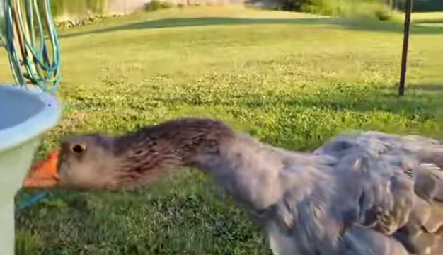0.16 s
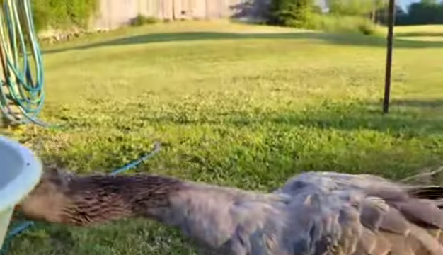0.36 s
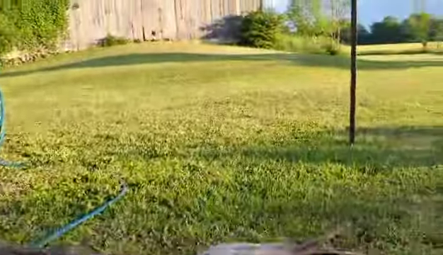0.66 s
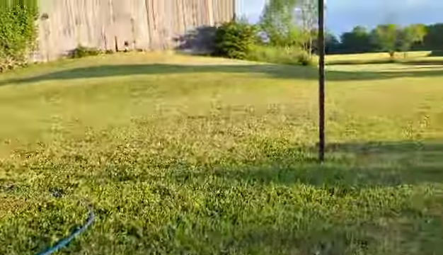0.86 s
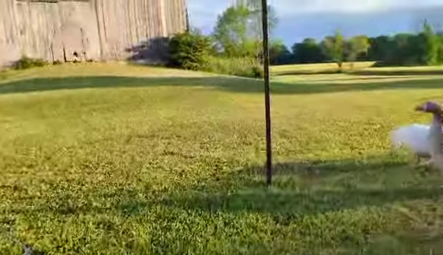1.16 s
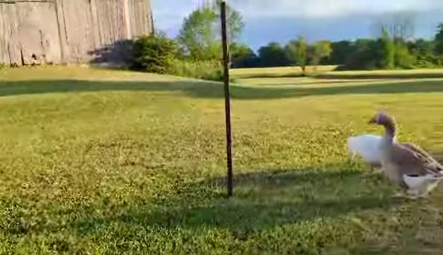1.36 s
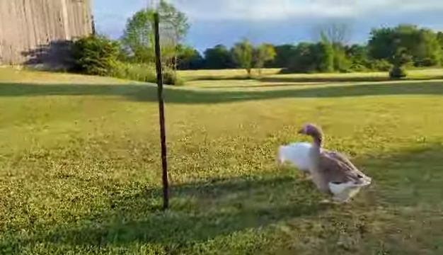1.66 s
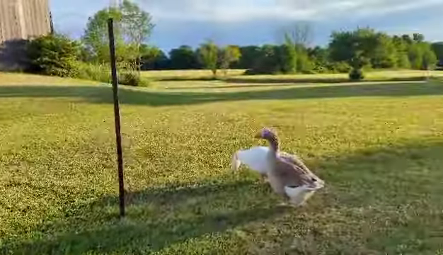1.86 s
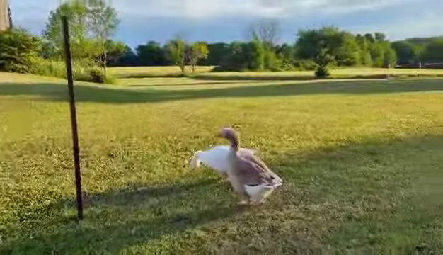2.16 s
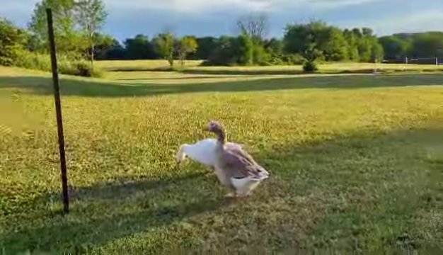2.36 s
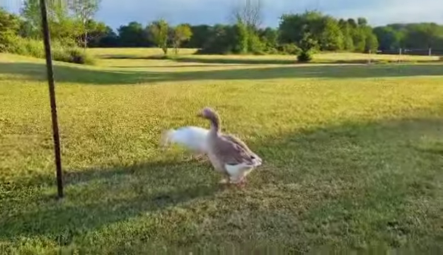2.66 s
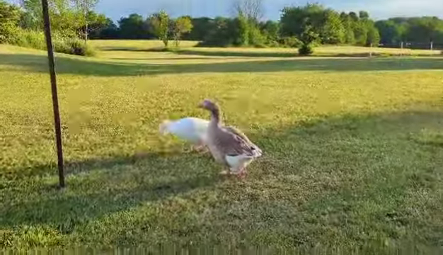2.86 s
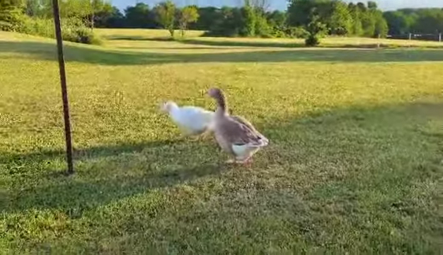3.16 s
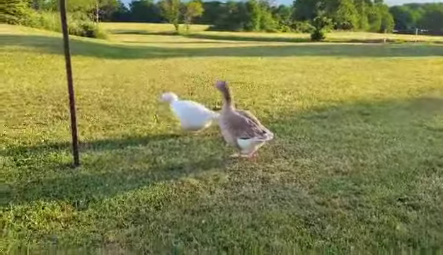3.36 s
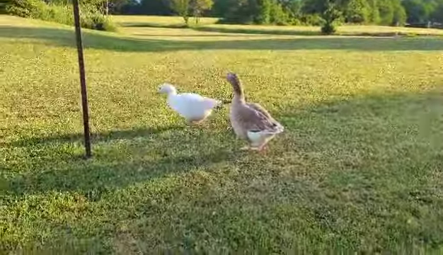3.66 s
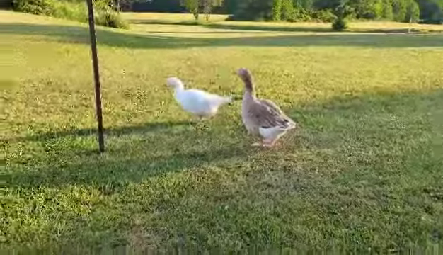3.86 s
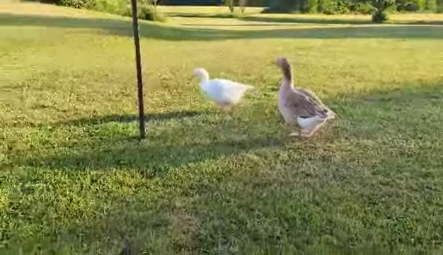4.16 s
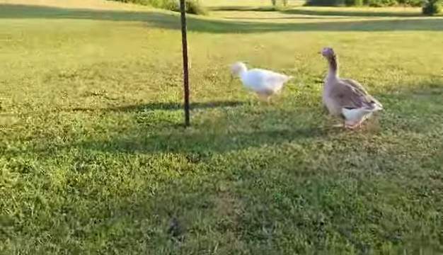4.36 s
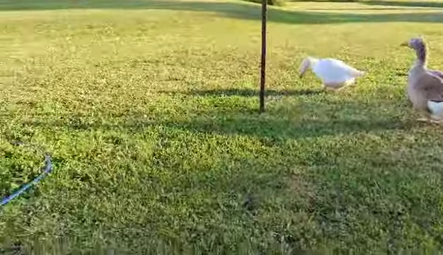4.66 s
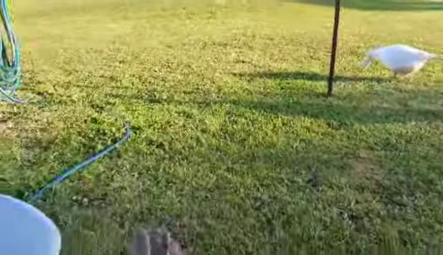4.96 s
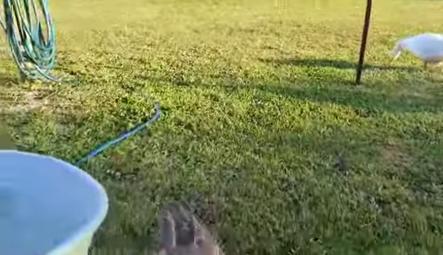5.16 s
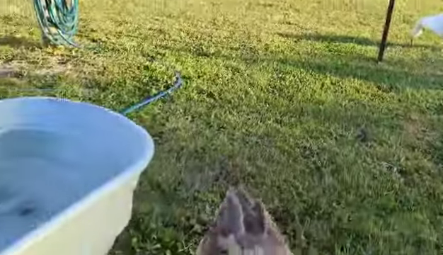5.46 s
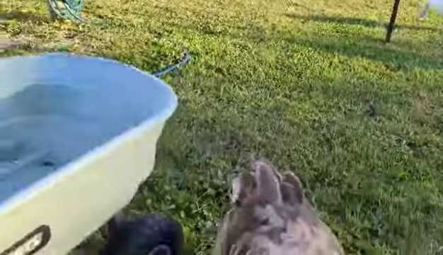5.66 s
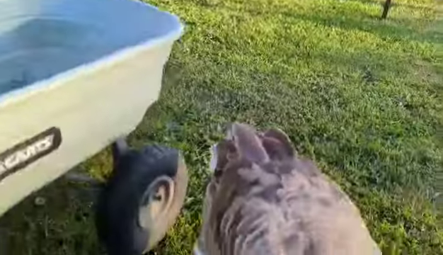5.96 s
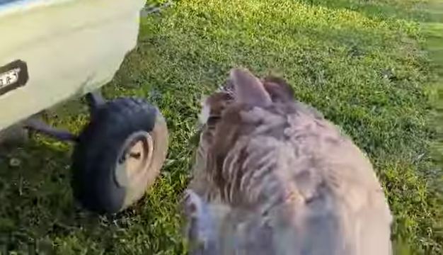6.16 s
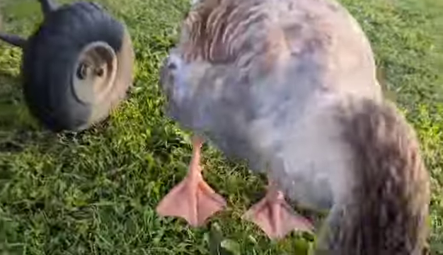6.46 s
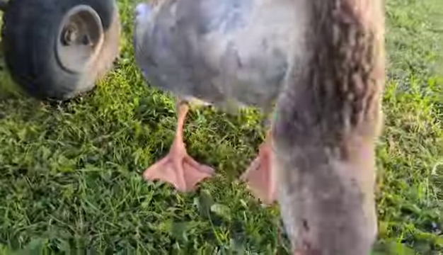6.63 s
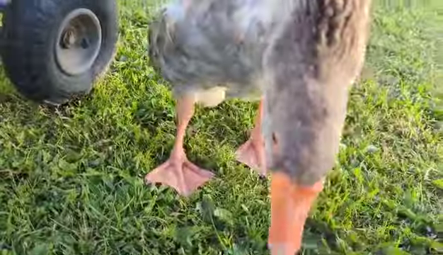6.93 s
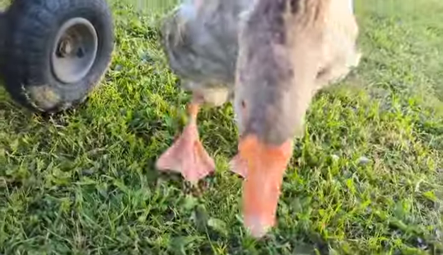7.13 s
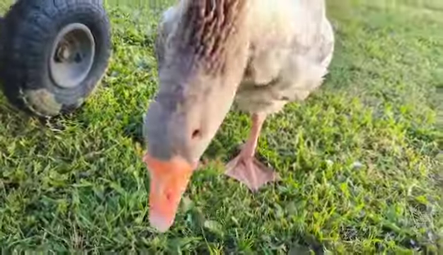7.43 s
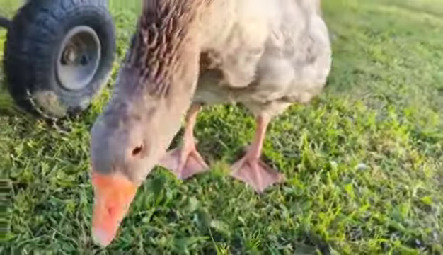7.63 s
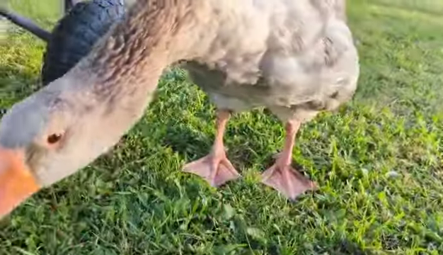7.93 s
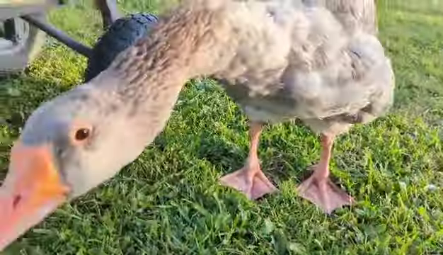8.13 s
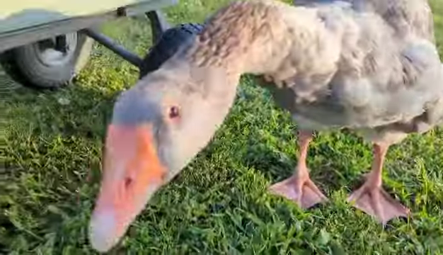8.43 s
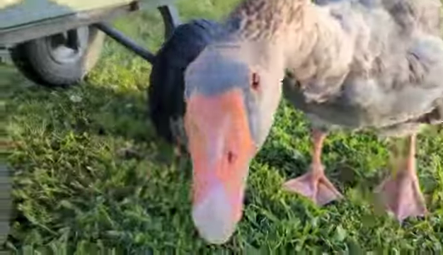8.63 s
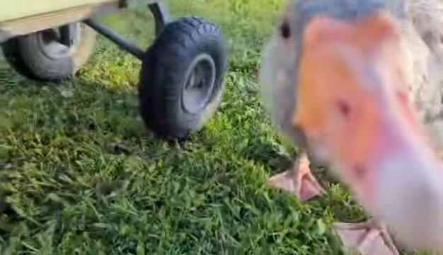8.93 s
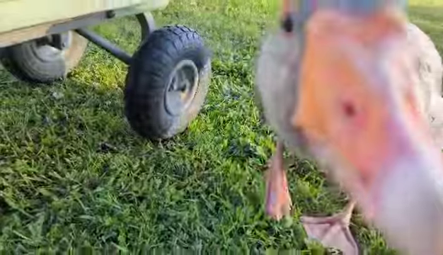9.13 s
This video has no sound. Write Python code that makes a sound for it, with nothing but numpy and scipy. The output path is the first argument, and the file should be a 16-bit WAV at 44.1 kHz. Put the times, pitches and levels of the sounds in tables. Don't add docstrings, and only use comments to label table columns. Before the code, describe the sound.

A close goose squeaks, growls and honks rapidly, two others answer farther off, then it blares again nearby amid crackling grass and light wind.

```python
import sys
import numpy as np
from scipy import signal
from scipy.fft import rfft, irfft, next_fast_len
from scipy.io import wavfile
from scipy.ndimage import uniform_filter1d, map_coordinates

SR = 44100
rng = np.random.default_rng(int(sys.argv[2]) if len(sys.argv) > 2 else 0)


def natural_amplitude(level_db):
    exponent = np.asarray(level_db, float) / 20
    return 10 ** exponent


def store_wav(level_fs):
    pcm = np.round(np.clip(np.atleast_2d(level_fs), -1, 1) * 32767)
    wavfile.write(sys.argv[1], SR, pcm.T.astype(np.int16))


N = 409679
TIME = np.arange(N) / SR

# (time [s], pulse rate [Hz], throat level [dB], chest tone [dB])
GROWLS = [
    [(0.0, 161, -52.5, -61), (0.064, 166.9, -48, -63), (0.106, 187.6, -36, -56), (.17, 163.5, -44.5, -66),
     (0.264, 176.3, -46, -73), (0.33, 173.8, -42.5, -59)],
    [(0.74, 212.6, -79, -90), (0.804, 175.2, -32, -45.5), (0.84, 156, -58.5, -69)],
    [(2.21, 175.2, -54, -66), (2.245, 170.2, -52, -73), (2.276, 170, -49, -57), (2.34, 190.5, -39.5, -70),
     (2.378, 169.3, -43.5, -68), (2.442, 201, -60.5, -56.5), (2.6, 168, -86, -58)],
    [(7.662, 202, -43, -40), (7.68, 194.4, -30.5, -28.5), (7.728, 189.6, -38, -30),
     (7.75, 175.8, -44.5, -63.5), (7.8, 174.7, -57, -62)],
    [(7.81, 168.2, -32, -69), (7.84, 178, -38, -42), (7.87, 156, -51, -67)],
]
# (time [s], pulse rate [Hz], throat level [dB], chest tone [dB])
LAST_GROWL = [(7.895, 164.6, -39.5, -57), (7.97, 168.9, -35.5, -34), (8.033, 189.3, -35, -45),
              (8.092, 161.6, -34.5, -37), (8.15, 186.1, -35, -44), (8.207, 171.4, -37, -47),
              (8.259, 193.8, -35, -63), (8.302, 184.8, -36.5, -38), (8.333, 155.4, -36.5, -73)]
# (frequency [Hz], width [Hz], level [dB])
THROAT_MODES = [(530, 110, 2), (683, 82, 4.5), (900, 37, -5.5), (1120, 900, 2)]
# (frequency [Hz], width [Hz], level [dB])
BEAK_MODES = [(1910, 250, -11.5), (2500, 410, -16.5), (3540, 680, -16)]
PUFF_BITE_DB = 3

# (start [s], length [s], first pitch [Hz], last pitch [Hz], level [dB])
SQUEAKS = [(0, 0.088, 597, 508, -47), (.064, 0.069, 490, 727, -43.5), (.09, 0.14, 755, 662.6, -36.5),
           (.218, 0.078, 696, 757, -34), (.288, 0.057, 760, 843, -31), (.385, 0.039, 754, 830, -30),
           (.412, 0.075, 824.7, 793, -35), (.48, 0.1, 794, 817.5, -29.5), (.586, 0.05, 744, 834, -31),
           (.675, 0.046, 787, 811, -34), (7.897, 0.045, 780, 826, -25.5), (8.195, 0.12, 718, 767, -32.5)]
# (start [s], length [s], first pitch [Hz], last pitch [Hz], level [dB])
PIPS = [(4.71, 0.13, 831, 615, -52), (5.11, 0.13, 700, 692, -55.5), (5.96, 0.16, 841, 695, -60.5),
        (6.33, .11, 900, 726, -49), (6.645, 0.11, 866, 659, -42.5)]
# (start [s], length [s], first pitch [Hz], last pitch [Hz], level [dB])
HOOTS = [(6.615, 0.05, 470, 455, -58)]
# (start [s], length [s], first pitch [Hz], last pitch [Hz], level [dB])
SHRIEKS = [(.618, .034, 806, 860, -34.5), (.708, 0.047, 803, 856, -35)]
# (start [s], length [s], first pitch [Hz], last pitch [Hz], level [dB])
MURMURS = [
    (2.215, 0.0693, 668, 647, -41),
    (2.282, .07, 653, 750, -40),
    (2.345, 0.052, 761, 710, -39.5),
]
# (start [s], length [s], first pitch [Hz], last pitch [Hz], level [dB])
YELPS = [(2.08, 0.089, 759, 694, -36)]
# (frequency [Hz], level [dB])
REED = [(1200, -1.5), (1600, 7), (2400, 2.5), (3300, 1.5), (4200, -11), (5000, -13.5), (7000, -17),
        (10000, -32.5)]
# (frequency [Hz], level [dB])
WIDE = [(1700, -2), (2500, -15.5), (3350, -2), (4200, -22), (5000, -7.5), (7000, -24.5), (10000, -29)]
# (frequency [Hz], level [dB])
PIPE = [(1200, 0), (1600, -2), (2400, -11), (3300, -20)]
# (brokenness [0-1.6], overtones [dB], air [dB], crest position [0-1],
# loss at the start [dB], loss at the end [dB])
FULL = (1, -12, -15, 0.4, -0.5, 4.5)
FAINT = (0.8, -6, -14, .65, 8, 9)
PURE = (.1, -30, -30, 0.5, 8, 8)
SHRILL = (0.46, 6, -14, 6, 2.5, 2.5)
LEVEL = (0.7, -15.5, -20.5, -6.5, 6.5, 0)
SUDDEN = (1.57, -10.5, -14.5, 0, 9, 14)
ARCH = 0.011
REEDY_HZ, REEDY_SPAN_HZ, REEDY_DB_PER_HZ = 801.7, 30, 0.5

# (time [s], level [dB])
AIR = [(0, -68.5), (3.6, -70.5), (3.8, -71.5), (4.6, -71.5), (6, -67.5), (9.3, -69)]
# (frequency [Hz], density [dB per Hz])
FIELD = [(71, -37.5), (120, -10.5), (398, -8.5), (466, -6), (2680, -3.5), (4140, -11.5), (6130, -9.5),
         (12200, -19.5), (13200, -40)]
# (start [s], hold [s], level [dB])
RUSTLES = [(.13, 0.62, -62.5), (.88, .04, -60.5), (1.27, 0.12, -73), (2.0, 0.033, -64.5), (2.25, 0.34, -70),
           (2.88, .03, -69.5), (3.1, .03, -68), (3.25, 0.042, -62.5), (3.43, 0.076, -61), (3.6, .06, -60),
           (3.8, 0.068, -63), (3.975, 0.028, -56.5), (4.02, .08, -64.5), (4.3, 0.037, -58.5),
           (4.82, 0.39, -56.5), (5.2, 0.39, -61.5), (5.6, 0.22, -59.5), (5.88, 0.25, -63.5),
           (6.33, 0.055, -58.5), (6.48, .03, -55), (6.54, 0.45, -64.5), (6.75, 0.0079, -46),
           (7.12, .14, -59.5), (7.41, 0.025, -62.5), (7.58, 0.019, -60), (7.68, 0.026, -53.5),
           (7.9, 0.58, -67.5), (8.65, 0.099, -60), (8.8, .2, -66), (9.12, 0.5, -57)]
# (frequency [Hz], density [dB per Hz])
HISS = [(880, -36), (1500, -5), (2260, -11), (2810, -9.5), (6200, 2), (10500, -1), (12300, 2.5),
        (13200, -6.5)]
# (start [s], hold [s], level [dB])
STRIDES = [
    (.89, 0.0015, -55.5),
    (1.57, 0.0099, -64.5),
    (4.3, .03, -68.5),
    (4.35, 0.063, -48.5),
    (4.75, 0.12, -59.5),
    (4.84, 0.4, -53.5),
    (5.66, 0.12, -45),
    (5.82, 0.098, -59.5),
]
# (frequency [Hz], density [dB per Hz])
GRASS = [(290, -29.5), (500, -27), (935, -15.5), (1260, -3), (2110, -13), (2880, -11), (6270, -15),
         (8000, -20.5), (10400, -28), (17600, -120)]
# (start [s], hold [s], level [dB])
GUSTS = [(0, 2.65, -69), (1.85, 0.34, -68), (3.06, 0.13, -53.5), (3.2, .12, -47.5), (3.59, 0.02, -66.5),
         (4.38, 0.036, -66.5), (4.86, 0.013, -50.5), (5.25, 0.014, -58), (5.76, 0.014, -56),
         (5.9, 0.026, -59), (6.39, 0.018, -83), (6.67, 0.029, -68), (7.12, 0.061, -65), (7.4, 0.014, -66),
         (7.7, 0.38, -65.5), (8.3, 2, -85)]
# (frequency [Hz], density [dB per Hz])
RUMBLE = [(20, -37), (35, -26.5), (65, 2.5), (110, -5.5), (160, -8.5), (300, -57)]
BREEZE_DB = -85.5
RUSTLE_SLOPES, STRIDE_SLOPES, GUST_SLOPES, SIGH_SLOPES = (1100, 520), (450, 700), (700, 330), (900, 650)
LAZY_S = 0.085

# (start [s], length [s], second partial at the crest [Hz], its level [dB], roughness [0-1])
NEAR = [(.108, 0.062, 1108, -23.5, 0.07), (.259, 0.051, 1062, -34.5, 0), (.324, 0.086, 1140, -24.5, 0.25),
        (.415, 0.084, 1193, -23, 0.33), (.557, 0.044, 1182, -25, 0.53), (.645, 0.06, 1144, -25.5, 0.4),
        (.75, 0.072, 1163, -25, 0.41)]
# (start [s], length [s], second partial [Hz], its level [dB], roughness [0-1])
TURNED = [(2.4, 0.11, 1140, -24, 0.49), (2.507, 0.081, 1133, -23, 0.45)]
# (start [s], length [s], second partial at the crest [Hz], its level [dB], roughness [0-1])
WHITE = [(2.623, 0.078, 1052, -32.5, 0.32), (2.83, 0.1, 1008, -40.5, 0.5), (3.04, 0.098, 1007, -34.5, 0.45),
         (3.224, 0.11, 1034, -26, 0.27), (3.406, 0.1, 1006, -26, 0.048), (3.579, 0.098, 1005, -25.5, 0.07)]
# (start [s], length [s], second partial at the crest [Hz], its level [dB], roughness [0-1])
GREY = [(6.81, 0.13, 1065, -45.5, 0.48), (7.014, 0.1, 1047, -39, 0.27), (7.189, 0.12, 1078, -30.5, 0.16),
        (7.364, 0.1, 1054, -29.5, 0.03), (7.541, 0.087, 1026, -31.5, 0.087)]
# (start [s], length [s], second partial at the crest [Hz], its level [dB], roughness [0-1])
CLOSE = [(7.664, 0.071, 1119, -20.5, 0.66), (7.815, 0.052, 1038, -43.5, 0.64),
         (7.922, 0.045, 1100, -26, 0.064), (7.975, 0.095, 1089, -27, 0.4),
         (8.115, 0.085, 1102, -26.5, 0.21), (8.228, 0.081, 1134, -25, 0.41)]
BRASS = {"n": [(1250, -22.5), (1450, -16.5), (1950, 13), (2400, 1), (2900, -7), (3600, -5.5), (4500, -19.5),
         (5800, -13), (10000, -38.5)], "n turned": [(1250, 8.5), (1480, -32), (1800, 12), (2340, 3),
         (2740, -6.5), (3300, 0), (4000, -12), (4700, -15), (6500, -24.5), (10000, -40)],
         "n blast": [(1250, 2.5), (1550, -8), (1800, -2), (2140, 9), (2700, -10), (3300, -6.5),
         (3900, -7.5), (5800, -23.5), (10000, -41.5)], "n close": [(1250, -9), (1450, -7), (1860, 15),
         (2460, 8.5), (2800, -2), (3200, -1), (3700, 0), (4640, -18.5), (6500, -15), (10000, -56)],
         "w soft": [(1500, -4.5), (2000, -7), (2500, -12), (3100, -5.5), (3600, -14.5), (4200, -27),
         (8000, -22.5), (10000, -30)], "g soft": [(1550, -3), (2100, -2), (2600, 0.5), (3100, -6.5),
         (3700, -20), (4500, -23), (6000, -27), (10000, -25.5)], "w": [(1500, -6.5), (2000, -9.5),
         (2500, -14), (3000, 0.5), (3500, -22), (4000, -16), (5000, -33), (8000, -22.5), (10000, -31.5)],
         "g": [(1550, 4), (2100, -6), (2600, -3), (3100, -5), (3700, -17.5), (4500, -13.5), (6000, -32.5),
         (10000, -22)]}
# (brass over second partial [dB], fundamental over it [dB], crest position [0-1],
# doubled start [0-1], final pitch sag [0-1]; near bird only: lines at 1/3 and 2/3 of the pitch [dB])
MANNERS = [
    (NEAR, "n", (-12, -11.5, 0.37, 0.22, .05, 1, 1.5)),
    (TURNED, "n turned", (-16.5, -13.5, 0.57, 0.3, .06, 1.5, -2)),
    (WHITE[:2], "w soft", (-16.5, -10.5, 0.46, -0.05, .04)),
    (WHITE[2:3], "w soft", (-15.5, -9, 0.5, 1.4, .06)),
    (WHITE[3:], "w", (-14.5, -12.5, 0.58, 0.95, .08)),
    (GREY[:1], "g soft", (-8, -1, 0.02, -1, .04)),
    (GREY[1:2], "g soft", (-4, -2, 0.61, 1.7, .05)),
    (GREY[2:], "g", (-6, -5, 0.5955, 0.98, .08)),
    (CLOSE[:2], "n blast", (-7.5, -20, 0.52, 1.3, .1, 4, 0)),
    (CLOSE[2:], "n close", (-7.5, -16.5, 0.7, 0.86, .15, 4, -2.5))]
USUAL_DB, FUNDAMENTAL_LAGS = -36.5, 0.22
UPPER_STUMBLE, FAR_STUMBLE, REED_STUMBLE = .4, .7, .15

# (start [s], length [s], first pitch [Hz], last pitch [Hz], level [dB])
WHISTLES = [
    (.93, 0.44, 3570, 3390, -72),
    (1.51, 0.12, 3080, 3080, -73),
]
# (time [s], peak [dB], push [Hz], t60 [s], tub wall [Hz])
THUMPS = [
    (0.963, -45.5, 200, 0.15, 412),
    (1.316, -45, 186, 0.1, 227.6),
    (1.565, -34.5, 210, 0.2, 304),
    (2.368, -33.5, 290, 0.44, 386),
    (3.046, -35.5, 121.6, 0.082, 173),
]
# (time [s], peak [dB], left minus right [dB])
TICKS = [
    (3.977, -76, -11),
    (4.286, -55, 1),
    (4.432, -38.5, 1),
    (4.848, -39.5, -4),
    (5.253, -43, -10),
    (5.295, -44.5, -2),
    (5.657, -29, -2),
    (8.825, -58.5, -4),
]
# (start [s], hold [s], level [dB])
SIGHS = [(2.7, .012, -56), (2.93, .01, -60), (3.14, .012, -57), (3.34, .008, -56), (3.515, .01, -54),
         (3.685, .01, -54), (6.92, .01, -62), (7.12, .01, -60), (7.305, .015, -55), (7.47, .015, -56),
         (7.63, .012, -57), (2.165, .01, -60), (2.595, .015, -56), (8.33, .11, -53)]
# (frequency [Hz], level [dB])
OPEN_BEAK = [(1100, -7.5), (1500, -12.5), (2100, -3.5), (2800, -15.5), (3500, -6.5), (5000, -23),
             (9000, -33)]
# (time [s], lag of the left [samples], left minus right [dB])
PLACE = [(0, -11.5, 1), (0.802, -13, 6), (2.1, -21, 5), (2.598, -14.5, -4.5), (2.801, -1.5, -1),
         (3.7, -1, -3.5), (5, -14, 1.5), (6.001, -15.5, -1), (6.399, 8.5, 0.5), (7.604, 12.5, -6),
         (7.661, -7.5, 0), (7.897, -12.5, 2.5), (8.4, -11, 7.5)]


def unit(x):
    return x / np.sqrt(np.mean(x ** 2) + 1e-20)


def along(points, hz):
    f, v = np.transpose(points)
    return np.interp(np.log(hz + 1), np.log(f + 1), v)


def span(rows):
    s, *cols = np.transpose(rows)
    where = slice(int(max(s[0], 0) * SR), int(s[-1] * SR))
    return where, [np.interp(TIME[where], s, c) for c in cols]


def wobble(rate, size=N):
    knots = rng.standard_normal(300 if size < SR else 4000)
    return map_coordinates(knots, [np.arange(size) * rate / SR])


def filtered(x, response):
    m = next_fast_len(N + 8192)
    return irfft(rfft(x, m) * response(np.fft.rfftfreq(m, 1 / SR)), m)[..., :N]


def rush(spectrum, alike, patchy_db):
    z = signal.stft(rng.standard_normal((3, N)), nperseg=512)[2]
    field = uniform_filter1d(rng.standard_normal(z.shape[1:]), size=8, axis=0)
    field = uniform_filter1d(field, size=5, axis=1)
    common, *own = signal.istft(z * natural_amplitude(patchy_db * unit(field)), nperseg=512)[1][:, :N]
    return unit(filtered(alike * common + np.array(own), lambda hz: natural_amplitude(along(spectrum, hz))))


def turning(hz, rough):
    stumble = wobble(260, size=len(hz)) + 1.8 * wobble(60, size=len(hz))
    return 2 * np.pi * np.cumsum(hz) / SR + rough * stumble


def steadier(phase, hz, share=UPPER_STUMBLE):
    even = 2 * np.pi * np.cumsum(hz) / SR
    return even + share * (phase - even)


def overtones(phase, hz, spectrum, first, count, drift_db):
    k = np.arange(first, first + count)[:, None]
    gains = natural_amplitude(along(spectrum, k * hz))
    drift = natural_amplitude(drift_db * np.array([wobble(39, size=len(hz)) for _ in k]))
    partials = np.sin(k * phase + rng.uniform(0, 2 * np.pi, k.shape))
    return np.sum(gains * drift * partials, axis=0) / np.sqrt(np.sum(gains ** 2, axis=0) / 2)


def fades(size):
    n = np.arange(size)
    return np.clip(np.minimum(n, size - n) / (.004 * SR), 0, 1)


def note(s, length, first_hz, last_hz):
    where = slice(round(s * SR), round((s + length) * SR))
    u = (TIME[where] - s) / length
    return where, u, first_hz + (last_hz - first_hz) * u


def breath(tube):
    spectrum = [(350, -16.5), (800, 1.0)] + tube
    return unit(filtered(rng.standard_normal(N), lambda hz: natural_amplitude(along(spectrum, hz))))


def swells(rows, slopes):
    power = 0
    for s, hold, db in rows:
        loss_db = slopes[0] * np.maximum(s - TIME, 0) + slopes[1] * np.maximum(TIME - s - hold, 0)
        power = power + natural_amplitude(2 * (db - loss_db / (1 + hold / LAZY_S)))
    return np.sqrt(power)


def resonances(f, modes):
    total = 0
    for k, (centre, width, db) in enumerate(modes):
        damping = 1j * f * width
        total = total + (-1) ** k * natural_amplitude(db) * damping / (centre * centre - f * f + damping)
    return total


def growls():
    puffs, chest = np.zeros(N), np.zeros(N)
    for rows in [*GROWLS, LAST_GROWL]:
        where, (hz, db, chest_db) = span(rows)
        phase = turning(hz, 0.051)
        beat = np.diff(np.floor(np.maximum.accumulate(phase) / (2 * np.pi)), prepend=0) > 0
        uneven = natural_amplitude(2.2 * rng.standard_normal(SR)[:len(db)])
        puffs[where] += fades(len(db)) * natural_amplitude(db + 40.0) * uneven * beat
        chest[where] += fades(len(db)) * np.sqrt(2) * natural_amplitude(chest_db) * np.sin(phase)
    eddies = 5.0 * uniform_filter1d(puffs ** 1.2, size=60) * rng.standard_normal(N)

    def throat(f):
        dark = (1j * f / (1j * f + 420)) ** 2 / (1 + (f / 1300) ** 8)
        return resonances(f, THROAT_MODES) * dark

    def beak(f):
        return resonances(f, BEAK_MODES) / (1 + 1j * f / 5000) ** 2

    return filtered(puffs, throat) + filtered(eddies + natural_amplitude(PUFF_BITE_DB) * puffs, beak), chest


def squeaks():
    out, air = np.zeros(N), breath(REED)
    # notes, manner, overtone spectrum, overtone count, drift of overtones in dB
    kinds = [(SQUEAKS, FULL, REED, 10, 4), (PIPS, FAINT, PIPE, 3, 4), (HOOTS, PURE, REED, 10, 4),
             (SHRIEKS, SHRILL, WIDE, 10, 1.5), (MURMURS, LEVEL, REED, 10, 4), (YELPS, SUDDEN, REED, 10, 4)]
    for rows, manner, spectrum, count, drift_db in kinds:
        broken, over_db, air_db, crest, start_db, end_db = manner
        crest = max(crest, .05)
        for s, length, first_hz, last_hz, db in rows:
            where, u, hz = note(s, length, first_hz, last_hz)
            rise_db = start_db * (1 - u / crest) ** 2
            fall_db = end_db * ((u - crest) / (1 - crest)) ** 2
            loss_db = np.where(u < crest, rise_db, fall_db)
            hz = hz * (1 + ARCH * np.sin(np.pi * u))
            phase = turning(hz, 0.5 * broken)
            opening_db = REEDY_DB_PER_HZ * np.clip(hz - REEDY_HZ, 0, REEDY_SPAN_HZ) * (rows is SQUEAKS)
            reed_phase = steadier(phase, hz, REED_STUMBLE)
            reed = overtones(reed_phase, hz, spectrum, first=2, count=count, drift_db=drift_db)
            tone = np.sqrt(2) * np.sin(phase) + natural_amplitude(over_db + opening_db) * reed
            rasp = natural_amplitude(air_db) * air[where] * (1 + np.cos(phase))
            if rows is PIPS:
                tone *= 1.15 * np.abs(np.sin(turning(np.full(len(u), 14.), .3))) ** 0.6
            level = natural_amplitude(db - loss_db + 2.2 * broken * wobble(50, size=len(u)))
            out[where] += fades(len(u)) * level * (tone + rasp)
    return out


def grain(depth_db, gust_db):
    return natural_amplitude(depth_db * wobble(300) + gust_db * wobble(25))


def grass():
    crackle = unit(grain(1.8, gust_db=3.0) * rush(HISS, alike=0.14, patchy_db=1.5))
    brush = unit(grain(1.0, gust_db=1.3) * rush(GRASS, alike=0.14, patchy_db=2.5))
    air_db = np.interp(TIME, *np.transpose(AIR)) + 2.4 * wobble(2.5)
    air = natural_amplitude(air_db) * rush(FIELD, alike=0.86, patchy_db=2.5)
    rustles = natural_amplitude(4.0) * swells(RUSTLES, RUSTLE_SLOPES) * crackle
    strides = natural_amplitude(2.83) * swells(STRIDES, STRIDE_SLOPES) * brush
    return rustles + strides + air


def wind():
    own_db = 2.0 * np.array([wobble(15), wobble(31)])
    lumps = natural_amplitude(own_db + 0.89 * wobble(7.3) + [[-2.2], [2.2]])
    buffeting = unit(lumps * rush(RUMBLE, alike=0.35, patchy_db=4.5))
    return natural_amplitude(2.0) * (swells(GUSTS, GUST_SLOPES) + natural_amplitude(BREEZE_DB)) * buffeting


def honk(row, bird, manner, air):
    s, length, top_hz, db, rough = row
    brass_db, first_db, crest, doubling, sag, *locks = manner
    near, tube = bird[0] == "n", BRASS[bird]
    where, u, _ = note(s, length, top_hz, top_hz)
    size = len(u)

    skew = np.log(.5) / np.log(np.clip(crest, .1, .9))
    effort = np.abs(np.sin(np.pi * np.clip(u, 0, 1) ** skew))
    effort = effort ** (.68 if near else .9)
    late = np.clip((u - crest) / (1 - crest), 0, 1)
    scoop = .07 if bird == "n close" else .03 if near else .015
    hz = top_hz / 2 * (1 - sag * late ** 2.0 - scoop * (1 - effort) * (late == 0))
    start = doubling * np.exp(-(u * length / 0.025) ** 2)
    phase = turning(hz, 1.114 * rough + .5 * start)
    steady = steadier(phase, hz)

    first = natural_amplitude(first_db - FUNDAMENTAL_LAGS * (db - USUAL_DB))
    low = (1 - .5 * start) * np.sin(2 * steady) + first * np.sin(phase)
    doubled = (1 if near else 1.6) * start
    if not near:
        doubled = doubled + 0.55 * rough * natural_amplitude(4.4 * wobble(45, size=size))
    croak = doubled * effort ** 1.1 * np.sin(1.5 * phase)

    upper = steadier(phase, hz, UPPER_STUMBLE if near else FAR_STUMBLE)
    brass = overtones(upper, hz, tube, first=3, count=15, drift_db=4.5 if near else 3.5)
    if near:
        third_db, two_thirds_db = locks
        brass += natural_amplitude(third_db) * overtones(steady / 3, hz / 3, tube, first=6.2, count=34, drift_db=2.5)
        brass += natural_amplitude(two_thirds_db) * overtones(steady / 1.5, hz / 1.5, tube, first=4, count=19, drift_db=3.5)
        low += 0.17 * rough * (np.sin(4 * phase / 3) + np.sin(5 * phase / 3))

    leak = (.3 if bird[0] == "g" else .05) + (.6 if near else 1.3) * rough + start
    rasp = leak * air[where] * (1 + np.cos(phase))
    flutter = natural_amplitude((2.8 if near else 5) * rough * wobble(170, size=size))
    body = np.sqrt(2) * (effort ** 1.21 * low + croak)
    return where, natural_amplitude(db) * flutter * (body + natural_amplitude(brass_db) * effort ** 0.55 * (brass + rasp))


def honks():
    out = np.zeros(N)
    for rows, bird, manner in MANNERS:
        air = breath(BRASS[bird])
        for row in rows:
            where, call = honk(row, bird, manner, air)
            out[where] += call
    return out


def far_bird():
    out = np.zeros(N)
    for s, length, first_hz, last_hz, db in WHISTLES:
        where, u, hz = note(s, length, first_hz, last_hz)
        level = np.sin(np.pi * u) ** 0.5 * natural_amplitude(db + 2.2 * wobble(18, size=len(u)))
        out[where] = np.sqrt(2) * level * np.sin(turning(hz, 0.12))
    return out


def knocks():
    out, t = np.zeros((2, N + SR)), np.arange(SR // 4) / SR
    for s, db, hz, t60, wall_hz in THUMPS:
        pole = np.exp(2 * np.pi * (1j * wall_hz - 0.56 * wall_hz) / SR)
        boom = unit(signal.lfilter([1], np.poly([pole] * 3), rng.standard_normal(len(t))).real)
        push = np.sin(2 * np.pi * hz * t) * natural_amplitude(-60 * t / 0.077)
        scrape = 0.2 * natural_amplitude(-60 * t / .02) * rng.standard_normal(len(t)) * (hz > 195) / 3
        thump = push + scrape + 0.56 * boom * natural_amplitude(-60 * t / t60)
        out[:, round(s * SR):][:, :len(t)] += natural_amplitude(db) * thump * (1 - np.exp(-t / 0.0031))
    for s, db, pan_db in TICKS:
        click = np.sin(2 * np.pi * 1500 * t) * natural_amplitude(-60 * t / 0.0082)
        snap = click + 0.2 * rng.standard_normal(len(t)) * natural_amplitude(-60 * t / 0.0051)
        sides_db = np.array([[pan_db / 2], [-pan_db / 2]])
        out[:, round(s * SR):][:, :len(t)] += natural_amplitude(db + 3.5 + sides_db) * snap
    return out[:, :N]


def sighs():
    return swells(SIGHS, SIGH_SLOPES) * breath(OPEN_BEAK) * natural_amplitude(1.5 * wobble(60))


def placed(x):
    s, lag, pan_db = np.transpose(PLACE)
    lag, pan_db = np.interp(TIME, s, lag) / 2, np.interp(TIME, s, pan_db) / 2
    ports = []
    for side in (1, -1):
        delayed = map_coordinates(x, [np.arange(N) - side * lag], order=3)
        ports.append(natural_amplitude(side * pan_db) * delayed)
    return np.array(ports)


def barn(x):
    t = np.arange(SR // 2) / SR
    scatter = natural_amplitude(-15 - 60 * t / .02) / np.sqrt(.02)
    wall = natural_amplitude(-25 - 60 * t / .3) / np.sqrt(.3)
    tail = rng.standard_normal((2, len(t))) * (scatter + wall) * np.sqrt(np.log(1e6) / SR)
    return signal.fftconvolve(np.pad(x, (60, 0))[None], tail, axes=1)[:, :N]


def scene():
    throat, chest = growls()
    geese = throat + squeaks() + honks() + sighs()
    return placed(geese + chest) + barn(geese) + grass() + wind() + far_bird() + knocks()


def roll_off(x):
    return signal.sosfilt(signal.butter(12, 13990, fs=SR, output="sos"), x)


def record(dry):
    return roll_off(dry)


dry = scene()
out = record(dry)
store_wav(out)
```